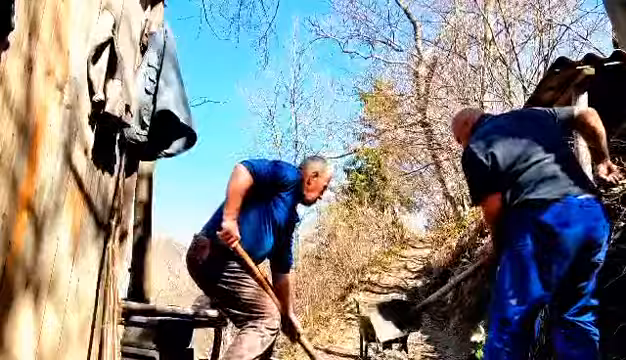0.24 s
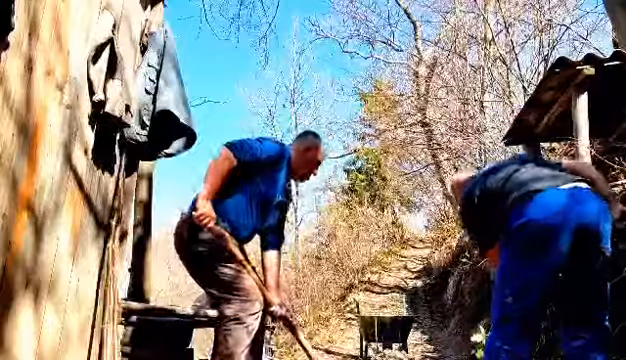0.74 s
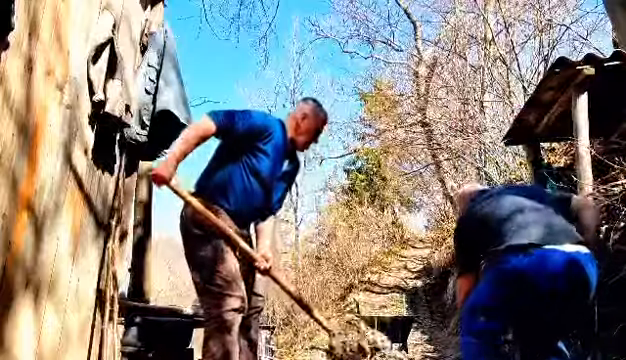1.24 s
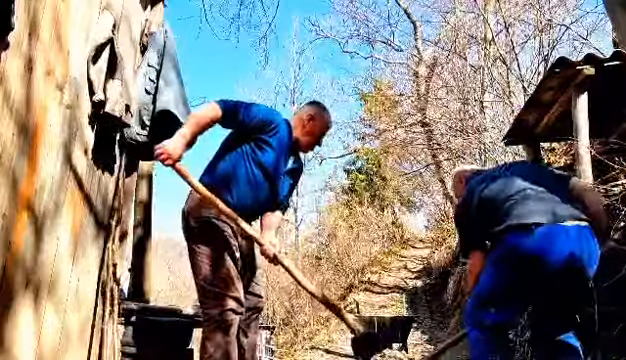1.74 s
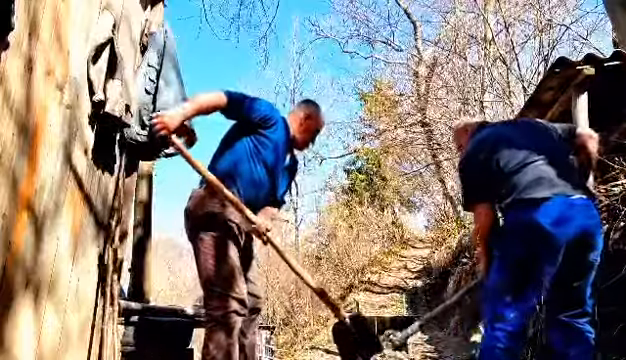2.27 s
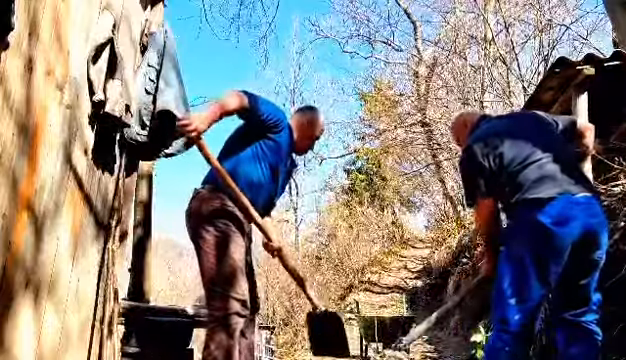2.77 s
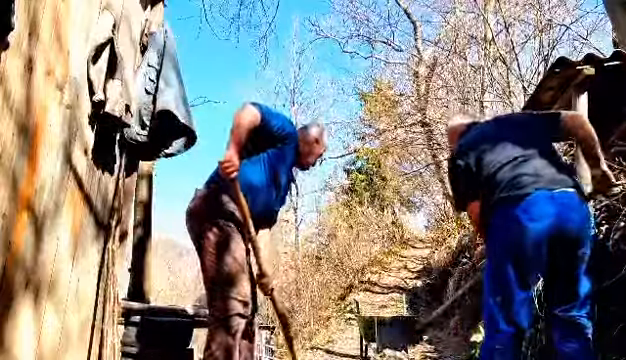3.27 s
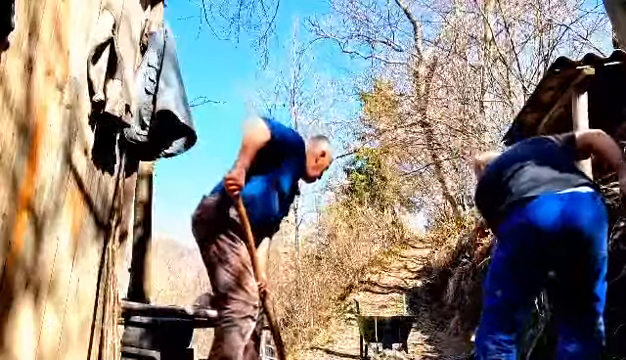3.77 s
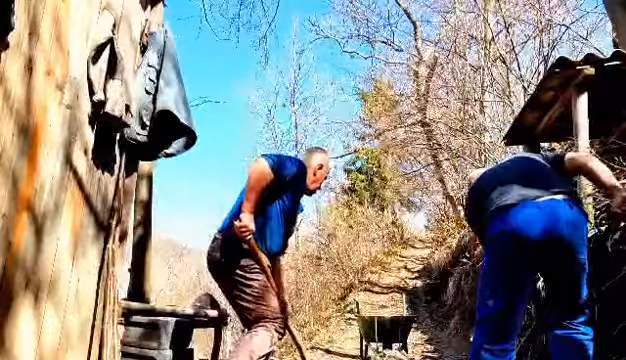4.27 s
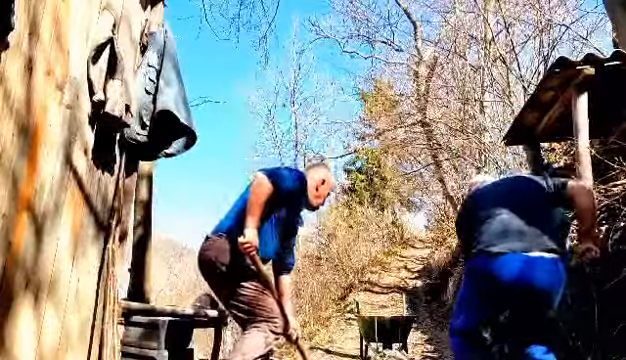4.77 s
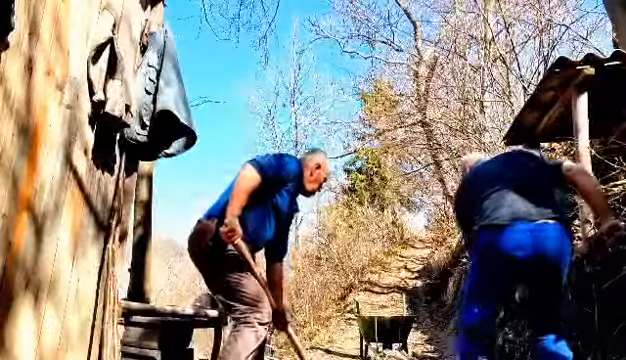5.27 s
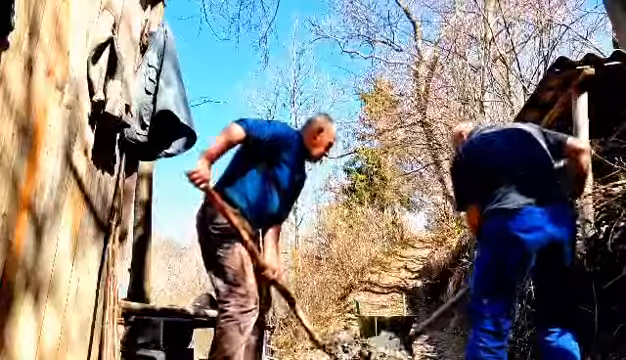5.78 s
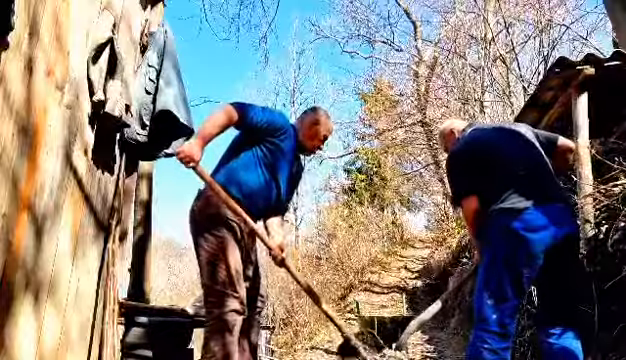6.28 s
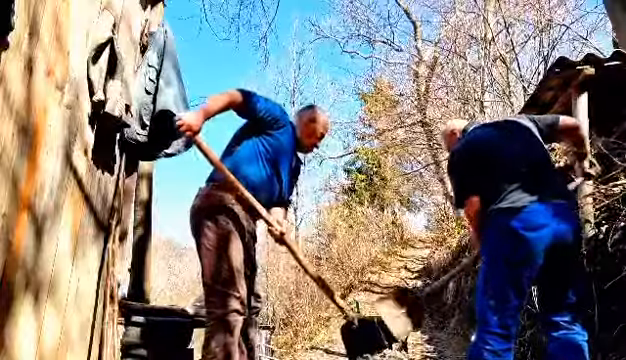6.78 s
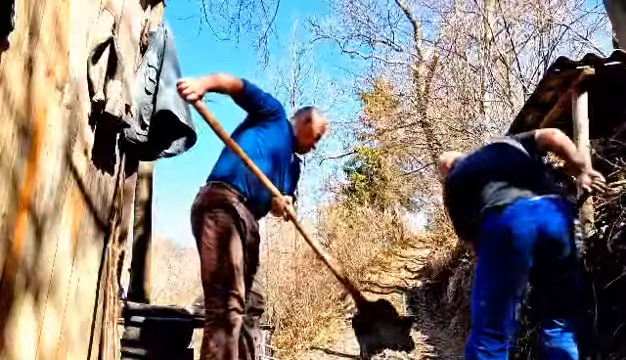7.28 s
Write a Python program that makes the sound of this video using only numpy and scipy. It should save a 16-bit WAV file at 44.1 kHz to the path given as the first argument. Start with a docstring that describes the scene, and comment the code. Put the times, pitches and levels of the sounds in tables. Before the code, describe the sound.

Close outdoor stereo pickup of two men turning wet concrete with steel shovels beside a wall. Dull, gritty pushes into the heap come first, then bright, hissing metallic scrapes with a sharp ringing knock. After a short lull the blade crunches into the heap again, fades, and more rasps and knocks follow. Pebbles tick and lumps thud over faint low air rumble, with slight dull echoes.

```python
"""Two men turn wet concrete with steel shovels on hard ground beside a wall; open air rumbles faintly throughout.
0-1.4 s: a blade pushed into the heap grinds dully, as crushed grains drive damped plate modes. 1.5-3 s: a bare
blade rasps brightly, as grains excite ringing steel; its edge knocks on the ground. 3-5.8 s: the heap grinds again
under a shifting note, with jams, then faintly. 5.9-7.3 s: bare rasps and knocks return; a last push is faint.
Lumps thud, pebbles tick and trapped stones crack in between, as short noise bursts; a few dull echoes follow."""
import sys
import numpy as np
from scipy import signal
from scipy.fft import rfft, irfft
from scipy.io import wavfile

SR = 44100
rng = np.random.default_rng(int(sys.argv[2]) if len(sys.argv) > 2 else 0)


def output_pcm(signal):
    """Save a mono or channel-first signal as 16-bit PCM at the path in sys.argv[1].

    Samples are clipped to [-1, 1] before scaling.
    """
    pcm = np.clip(np.atleast_2d(signal).T, -1, 1) * 32767
    wavfile.write(sys.argv[1], SR, np.round(pcm).astype(np.int16))


N = 332073
TIME = np.arange(N) / SR
HZ = np.maximum(np.fft.rfftfreq(8192, 1 / SR), 1)


def from_db(db):
    """Decibels to gain."""
    return 10 ** (np.asarray(db) / 20)


def rms_one(x):
    """Scale to unit power; of a mid-side pair, the mid sets the scale."""
    return x / np.sqrt(np.mean(np.atleast_2d(x)[0] ** 2) + 1e-20)


def colour(points):
    """Gain over HZ, interpolated in dB over log frequency."""
    hz, db = np.transpose(points)
    return from_db(np.interp(np.log(HZ), np.log(hz), db))


def resonances(modes, order=1):
    """Gain of damped resonances, summed in power; a higher order has steeper skirts."""
    power = 0
    for hz, width_hz, db in modes:
        detuning = (HZ ** 2 - hz ** 2) / (HZ * width_hz)
        power = power + from_db(db) ** 2 / (1 + detuning ** 2 / order) ** order
    return np.sqrt(power)


def through(x, gain):
    """Causal minimum-phase filter with the given gain, by folding the cepstrum."""
    cepstrum = irfft(np.log(gain + 1e-6))
    cepstrum[1:len(HZ) - 1] *= 2
    cepstrum[len(HZ):] = 0
    impulse = irfft(np.exp(rfft(cepstrum)))[:len(HZ)]
    return signal.oaconvolve(x, impulse)[:len(x)]


# stereo image: (frequency [Hz], side re mid [dB])
SIDE_WIDTH = [(100, -14), (350, -12.5), (620, -1.5), (950, -11.5), (1350, -7), (1800, -0.5), (2300, -0.5),
              (3000, -5.5), (4300, -0.5), (5300, 1.5), (6400, -2.5), (7700, 1), (12000, 1.5)]


def radiate(pair, gain):
    """Colour a mid-side pair; the image generally widens toward the treble."""
    return np.array([through(pair[0], gain), through(pair[1], gain * colour(SIDE_WIDTH))])


def drift(rate_hz):
    """Smooth random walk about zero with RMS 1: twice low-passed noise, drawn every 20th sample."""
    pole = np.exp(-40 * np.pi * rate_hz / SR)
    noise = rng.standard_normal(N // 20 + 2002)
    slow = signal.lfilter([1], [1, -2 * pole, pole * pole], noise)[2000:]  # drop the run-in
    return np.interp(np.arange(N) / 20, np.arange(len(slow)), rms_one(slow))


def add(out, start_s, sound):
    """Mix a sound in at a time."""
    at = int(start_s * SR)
    out[:, at:at + sound.shape[1]] += sound[:, :N - at]


def grains(per_s, spread_db, judder_db, judder_hz):
    """Mid-side clicks of crushed grains, uneven in size; stick and slip sways their level."""
    born = rng.random(N) < per_s / SR
    size_db = spread_db * np.minimum(rng.exponential(1, N), 4) + judder_db * drift(judder_hz)
    return born * from_db(size_db) * rng.choice([-1, 1], (2, N))


def stone_ticks(per_s, spread_db, cycles_to_60db, low_hz, high_hz):
    """Coarse gravel: separate stones click on the steel, each at its own pitch; unit power."""
    out, t = np.zeros((2, N)), TIME[:SR // 50]
    for when, where, size, sign, side in rng.random((int(per_s * N / SR), 5)):
        hz = low_hz * (high_hz / low_hz) ** where
        level_db = -spread_db * np.log(max(size, .05))
        tick = np.sin(2 * np.pi * hz * t) * from_db(level_db - 60 * t * hz / cycles_to_60db)
        add(out, when * TIME[-1], np.outer([np.sign(sign - .5), 3 * (side - .5)], tick))
    return rms_one(out)


def sheet(pair, t60_s, ring_db):
    """Each spot on the steel answers with its own crack and ring; contact moves on every 60 ms."""
    out, t = np.zeros((2, N)), TIME[:SR // 8]
    crack_t60_s, stay = .003, int(.06 * SR)
    crack = from_db(-60 * t / crack_t60_s)
    ring = from_db(ring_db) * np.sqrt(crack_t60_s / t60_s) * from_db(-60 * t / t60_s)
    for at in range(0, N, stay):
        answer = rng.standard_normal((2, len(t))) * (crack + ring)
        answer /= np.linalg.norm(answer, axis=1, keepdims=True)
        add(out, at / SR, signal.fftconvolve(pair[:, at:at + stay], answer, axes=1))
    return out


SWELL_DB = 17  # nominal swell over the rise time, scaled by steepness
EDGE_CURVE = 1.146  # above 1, level falls ever faster away from full force
# fall away from full force, the hiss needing force while the mix keeps sliding: [grit, sand, plate, wet mix]
STEEPNESS = [1.015, 1.18, 0.92, 0.91]


def stroke_gains(strokes, release_db_per_s, loading_db):
    """Gains of grit, sand, plate, wet mix: a stroke swells, holds while the blade fills, dies away."""
    loudest_db = np.full((4, N), -120.0)
    for start, end, rise, change_db, *levels_db in strokes:
        near = slice(max(int((start - .4) * SR), 0), int((end + .4) * SR))
        t = TIME[near]
        progress = np.clip((t - start) / max(end - start, .005), 0, 1) - .5
        slack = np.maximum(start - t, 0) / rise + np.maximum(t - end, 0) * release_db_per_s / SWELL_DB
        held_db = np.c_[levels_db] + np.outer(change_db + np.array(loading_db), progress)
        stroke_db = held_db - SWELL_DB * np.outer(STEEPNESS, slack ** EDGE_CURVE)
        loudest_db[:, near] = np.maximum(loudest_db[:, near], stroke_db)
    return from_db(loudest_db)


def burst(fall_s, gain):
    """Rattle of contacts dying by 1/e in fall_s, in the given colour; about 1 high at its start."""
    t = TIME[:SR // 2]
    contacts = rng.choice([-1, 1], (2, len(t))) * np.exp(-t / fall_s)
    return radiate(contacts, rms_one(gain))


def ringing(modes, t):
    """Mid-side sum of dying modes, each at a random phase."""
    out = np.zeros((2, len(t)))
    for hz, db, t60_s in modes:
        phase = rng.uniform(0, 2 * np.pi, (2, 1))
        out += from_db(db - 60 * t / t60_s) * np.sin(2 * np.pi * hz * t + phase)
    return out


def wander(pair, speed):
    """Shift all resonances together by a slowly changing ratio, by variable-speed reading."""
    clock = np.cumsum(speed) % N
    return np.array([np.interp(clock, np.arange(N), part) for part in pair])


# rumble and hiss spectrum: (frequency [Hz], relative level [dB])
AIR_COLOUR = [(20, -14), (40, -11), (80, -2.5), (130, -11.5), (200, -13), (300, -23.5), (500, -28.5),
              (1000, -28), (1800, -39.5), (3000, -32), (7000, -45.5), (8300, -47.5), (13000, -54)]
# rumble level before drift: (time [s], level [dB])
AIR_LEVEL = [(0, -62.5), (2.9, -62.5), (3.4, -65.5), (4.6, -61), (5.1, -65), (7.4, -63.5)]


def air():
    """Low outdoor rumble that swells a little, under a faint hiss: coloured noise."""
    noise = rms_one(radiate(rng.standard_normal((2, N)), colour(AIR_COLOUR)))
    level_db = np.interp(TIME, *np.transpose(AIR_LEVEL)) + 1.4 * drift(8.2)
    return from_db(level_db) * noise


# echoes from wall and shed: (delay [s], level before trim [dB])
WALL_ECHOES = [(.0113, -17.5), (.0187, -17), (.031, -23.5), (.047, -28)]


def yard(pair):
    """A few delayed, low-passed copies of the mid, from left and right in turn."""
    out, dull = np.zeros((2, N)), through(pair[0], 1 / np.hypot(1, HZ / 5000))
    for k, (delay_s, db) in enumerate(WALL_ECHOES):
        add(out, delay_s, from_db(db - 2.5) * np.array([dull, 1.1 * (-1) ** k * dull]))
    return out


# heavy lumps land: (time [s], level [dB], 1/e fall time [s])
LUMP_FALLS = [(0.049, -73, 0.058), (0.68, -54, 0.072), (1.19, -53.5, 0.062), (1.388, -48.5, 0.025),
              (2.504, -42.5, 0.011), (3.792, -57, 0.011), (3.905, -45, 0.013), (4.716, -57, 0.065),
              (6.367, -42, 0.0062)]
# thud spectrum: (frequency [Hz], relative level [dB])
THUD_COLOUR = [(40, -3.5), (80, -6.5), (130, 12.5), (200, -7), (340, -3.5), (700, -33.5), (1500, -58)]


def lumps():
    """Shovelfuls land with a soft thud: low-coloured noise bursts."""
    out = np.zeros((2, N))
    for s, db, fall_s in LUMP_FALLS:
        add(out, s, from_db(db) * burst(fall_s, colour(THUD_COLOUR)))
    return out


# pebbles flick against the blade: (time [s], level [dB], pitch [Hz])
PEBBLE_HITS = [(0.708, -57, 4030), (1.394, -55, 3970), (1.6435, -44, 2780), (1.654, -39, 2530),
               (1.902, -45, 3900), (0.239, -72, 5540), (3.514, -65.5, 2660), (3.5534, -52.5, 2127),
               (3.579, -50, 1670), (3.601, -56, 2300), (3.7258, -50, 2330), (3.8743, -48, 2300),
               (3.919, -44.5, 5200), (4.0206, -44, 1900), (4.134, -47, 2000), (4.427, -42, 5950),
               (4.5553, -52, 3740), (4.574, -47, 5370), (4.686, -43, 2380), (4.7231, -50, 2900),
               (5.746, -51.5, 5400), (6.668, -40.5, 2540)]


def pebbles():
    """Small stones tick in a broad resonance: short noise bursts."""
    out = np.zeros((2, N))
    for s, db, hz in PEBBLE_HITS:
        tick = resonances([(hz, 0.59 * hz, 0)], order=2) * colour([(7500, 8.0), (8300, 1.0)])
        add(out, s, from_db(db) * burst(0.0097, tick))
    return out


# steel strikes ground: (time [s], chatter level [dB], dull above [Hz], chatter 1/e time [s],
#  ring re chatter before trim [dB], clunk re chatter [dB])
GROUND_KNOCKS = [ (1.398, -41.5, 5030, 0.008, -17, 4), (2.081, -36, 7000, 0.009, -4, -27),
                 (2.2389, -32, 13300, 0.0085, -8, -34), (2.5033, -22, 10830, 0.0017, -12.5, -20),
                 (2.5064, -19.5, 11000, 0.0028, -4, -17), (2.5100, -28, 3000, 0.0024, -16, -18),
                 (2.523, -31.5, 9000, 0.006, -3.5, -20), (3.7907, -37, 3120, 0.01, -23, -9),
                 (6.092, -43, 12000, 0.0076, -6, -17), (6.3688, -29, 995, 0.0046, -8, 2),
                 (6.394, -35, 3000, 0.0029, -11, -5), ]
# chatter spectrum: (frequency [Hz], relative level [dB])
KNOCK_COLOUR = [(100, -27), (280, -15.5), (430, -2.5), (570, -11.5), (800, -5), (980, 4), (1230, -5.5),
                (1450, -6.5), (1850, -11), (2400, -0.5), (2850, 0.5), (3400, -2), (4000, -5.5), (4950, -13),
                (5500, -8), (7050, -2.5), (7900, -23), (9500, -14), (11300, -23), (12500, -17),
                (13200, -27)]
# free ringing of a struck blade: (frequency [Hz], level [dB], t60 [s])
RING_MODES = [(300, -9, 0.11), (977, -5.5, 0.027), (1268, -4, 0.14), (1564, -7.5, 0.12), (2100, -16.5, .11),
              (2440, -13, 0.17), (2814, 0, 0.099), (2870, -4.5, 0.12), (3460, -6, 0.093),
              (3700, -14.5, 0.13), (4027, -8.5, .09), (4680, -22, 0.066), (5460, -18, 0.057),
              (6212, -14, 0.088), (7330, -14, 0.046), (9600, -13, 0.062)]
# flexing of a flat-landing blade, soon damped by the ground: (frequency [Hz], level [dB], t60 [s])
FLEX_MODES = [(309, -8.5, 0.05), (401, -6.5, .055), (730, -1.5, 0.053), (1100, -1, .03), (1326, -2, 0.039)]


def knocks():
    """The edge chatters on hard ground and the steel rings on; a flat landing also flexes with a low clunk."""
    out, t = np.zeros((2, N)), TIME[:SR // 2]
    for s, db, dull_hz, chatter_s, ring_db, clunk_db in GROUND_KNOCKS:
        soft = 1 / np.hypot(1, HZ / dull_hz)
        chatter = burst(chatter_s, colour(KNOCK_COLOUR) * soft)
        ring = radiate(ringing(RING_MODES, t) * (1 - np.exp(-t / 0.0012)), soft)
        clunk = ringing(FLEX_MODES, t) * (1 - np.exp(-t / 0.0021))
        clunk *= [[1], [from_db(-7.5)]]  # narrow image
        knock = chatter + from_db(ring_db - 5.0) * ring + from_db(clunk_db) * clunk
        add(out, s, from_db(db) * knock)
    return out


# a stone catches under the edge and jolts the plate: (time [s], peak [dB], plate note [Hz], crack [dB])
STONE_CATCHES = [(0.892, -37, 870, -23), (1.215, -36, 1040, -30), (1.658, -39, 1310, -21),
                 (1.779, -36.5, 1020, -18), (1.985, -32, 1340, -6), (2.71, -35, 1090, -21),
                 (3.827, -40, 1220, -20), (3.849, -37, 1220, -18), (3.924, -36.5, 525, -15),
                 (4.122, -36, 1120, -32), (4.227, -35, 1090, -21), (4.31, -37, 525, -24),
                 (4.507, -39, 940, -16), (4.689, -44, 1200, -23), (6.295, -41, 1130, -22),
                 (6.306, -34, 775, -23), (6.499, -35.5, 1150, -17), (6.533, -35.5, 1160, -25),
                 (6.582, -31.5, 1120, -10.5), (6.67, -40, 1150, -26), (6.701, -36, 1330, -11),
                 (6.881, -34.5, 1130, -17), (6.9, -33, 1310, -12), (7.013, -37, 1150, -4)]


def catches():
    """A trapped stone lets go with a crack and a short note of the plate: a resonant burst."""
    out = np.zeros((2, N))
    for s, db, hz, crack_db in STONE_CATCHES:
        modes = [(hz, 0.19 * hz, 0), (2900, 1900, crack_db), (6400, 1500, crack_db - 21)]
        jolt = burst(0.0027, resonances(modes, order=2))
        add(out, s, from_db(db) * jolt / np.abs(jolt).max())
    return out


# blade pushed through the heap, one row a push; levels before the layer trims:
# (full force from [s], until [s], rise [s], change of force [dB],
#  grit [dB], sand hiss [dB], plate [dB], wet mix [dB])
HEAP_PUSHES = [ (0.1, 0.3, .1, -3, -77, -82.5, -71, -75.5), (0.39, 0.70, 0.14, -1.5, -68, -81, -61, -63.5),
               (0.815, 0.915, 0.11, 1.5, -49, -54.5, -52.5, -54.5),
               (0.95, 1.08, 0.06, -5, -57.5, -66.5, -56.5, -70),
               (1.16, 1.26, 0.15, 0, -51.5, -59, -49, -46), (1.28, 1.37, .05, -8, -58.5, -64.5, -54, -52),
               (1.402, 1.428, 0.038, -3.5, -47.5, -52, -49.5, -50.5),
               (3.03, 3.28, 0.081, -0.5, -77, -78.5, -81.5, -93),
               (3.585, 3.77, 0.048, 9.5, -58.5, -70, -56.5, -65.5),
               (3.80, 4.06, 0.043, -0.5, -51.5, -61, -47.5, -62),
               (4.09, 4.42, 0.092, 0.5, -51, -60, -45.5, -52.5),
               (4.46, 4.64, 0.044, 5, -54.5, -61, -50, -54.5),
               (4.675, 4.76, 0.11, -2, -49.5, -61.5, -46, -46.5),
               (4.80, 4.825, 0.047, -11, -61, -69, -59, -57), (4.94, 5.33, 0.2, 3, -72, -80, -66, -66),
               (5.40, 5.56, 0.22, -0.5, -71, -74.5, -65.5, -71),
               (5.66, 5.84, 0.35, 4.5, -72, -72, -78, -78), (7.39, 7.52, 0.49, 5, -73, -73.5, -77, -73), ]
# buried plate's note, lowered by its load; 1010 Hz leaves the modes unshifted: (time [s], note [Hz])
LOADED_NOTE = [(.4, 993), (.9, 936), (1.25, 1003), (3.58, 1236), (3.85, 1086), (4.1, 1039), (4.4, 1001),
               (4.7, 1042)]
# gravel jams and the blade grinds harder: (time [s], 1/e half-length [s], level before trim [dB], note [Hz])
GRAVEL_JAMS = [(0.408, 0.087, 12, 979.6), (3.852, 0.02, 4, 1229), (4.099, 0.036, 12.5, 954.5),
               (4.256, 0.033, 8.5, 1032), (4.388, 0.02, 10, 924), (5.06, 0.015, 17.5, 1064),
               (5.222, 0.012, 10, 1051)]
# buried plate, its low bending under wet mix, its rasp: (frequency [Hz], width [Hz], level [dB])
BURIED_PLATE_MODES = [(892, 85, 4.5), (1063, 81, 3.5), (1195, 380, 0), (1466, 61, -4.5)]
BURIED_BODY_MODES = [(295, 107, -1), (409, 64, -1.5), (517, 89, 1.5), (685, 80, -1), (803, 45, 0.5)]
BURIED_RASP_MODES = [(1810, 160, -9), (2280, 370, -11), (2930, 67, 2.5), (3970, 240, -12), (7300, 81, 2.5)]
# grit and sand spectra, shared with the scrapes: (frequency [Hz], relative level [dB])
GRIT_COLOUR = [(1300, -26), (1850, -7), (2050, -5.5), (2400, -2), (2950, -2), (3150, -2.5), (4000, -4),
               (4600, -11), (6000, -44)]
SAND_COLOUR = [(3400, -33.5), (4600, -4), (5400, 3), (6700, 2), (7700, -2.5), (8200, -10), (10300, -10),
               (11400, -19), (12500, -5.5), (13300, -35)]


def digs():
    """Gravel crunches against a buried, damped blade whose note follows its load."""
    grit_gain, sand_gain, plate_gain, mix_gain = stroke_gains(
        HEAP_PUSHES, release_db_per_s=178.5, loading_db=[-0.41, -0.69, -0.49, 0.17])
    steel = np.hypot(1, resonances(BURIED_RASP_MODES))

    crushed = grains(per_s=4000, spread_db=0.5, judder_db=1.34, judder_hz=11)
    gravel = from_db(5.5) * grains(per_s=62, spread_db=1.5, judder_db=0.5, judder_hz=130)
    fine = sheet(crushed + gravel, t60_s=0.064, ring_db=5.0)
    grit_tilt = colour([(1700, 3.5), (2700, -2.5), (4000, -3.5)])
    crunch = rms_one(radiate(fine, colour(GRIT_COLOUR) * steel * grit_tilt))
    ticks = stone_ticks(per_s=160, spread_db=2.0, cycles_to_60db=26, low_hz=1256, high_hz=4160)
    grit = grit_gain * (crunch + from_db(-9.0) * ticks)
    sand_tilt = colour([(5000, 2.2), (12000, -3.0)])
    sand = sand_gain * rms_one(radiate(fine, colour(SAND_COLOUR) * steel * sand_tilt))

    stones = grains(per_s=1500, spread_db=0.5, judder_db=0.8, judder_hz=17)
    groan = rms_one(radiate(stones, resonances(BURIED_PLATE_MODES, order=2)))
    groan = wander(groan, np.interp(TIME, *np.transpose(LOADED_NOTE)) / 1010)

    # in a jam the edge sticks and slips, driving one narrow note between the plate's lowest modes
    slips = grains(per_s=1400, spread_db=0.0, judder_db=0.9, judder_hz=46)
    jam_gain = sum(from_db(db) * np.exp(-((TIME - s) / length_s) ** 2) for s, length_s, db, _ in GRAVEL_JAMS)
    jam_s, _, _, jam_hz = np.transpose(GRAVEL_JAMS)
    squeal = rms_one(radiate(slips, resonances([(jam_hz.mean(), 85, 0)], order=2)))
    squeal = wander(squeal, np.interp(TIME, jam_s, jam_hz) / jam_hz.mean())
    plate = plate_gain * (groan + from_db(-5.5) * jam_gain * squeal)

    clods = grains(per_s=800, spread_db=2.0, judder_db=2.5, judder_hz=21)
    mix = mix_gain * rms_one(radiate(clods, resonances(BURIED_BODY_MODES, order=2)))
    return from_db(-1.22) * grit + from_db(0.9) * sand + from_db(-1.0) * plate + from_db(-4.5) * mix


# bare plate, and low bending of bare blade and shaft:
# (frequency [Hz], width [Hz], level in first bout [dB], level in second bout [dB])
BARE_PLATE_MODES = [(943, 129, 2.5, 0), (1130, 155, 0, 1.5), (1335, 138, 4, 2), (1552, 110, -0.5, -1),
                    (1730, 200, -22, -12.5)]
BARE_BODY_MODES = [(308, 73, -4, -2.5), (401, 72, 1.5, 5), (501, 66, 1, 1), (703, 98, 2.5, 5),
                   (795, 64, -16, 0.5)]


def bare_modes(modes, start_s):
    """The blade is held at another angle in each bout, which weights its modes differently."""
    in_bout = [(hz, width, first if start_s < 4 else second) for hz, width, first, second in modes]
    return resonances(in_bout, order=3)


# upper resonances that stand out of the rasp: (frequency [Hz], width [Hz], level [dB])
BARE_RASP_MODES = [(2175, 76, 0), (2300, 55, -7), (2560, 220, -5), (2860, 110, 3.5), (3410, 110, -1),
                   (4950, 110, -1), (5800, 60, 7.5), (6590, 200, 5.5), (7140, 170, 6)]


def stroke_colours(start_s, plate_hz, edge_hz, whistle_hz, tilt_db_per_octave):
    """Colours of grit, sand, plate, wet mix for one scrape, with the notes its contact point favours."""
    favoured = [(edge_hz, 76, 6.5), (whistle_hz, 75, 5.8)]
    steel = np.hypot(1, resonances(BARE_RASP_MODES + favoured))
    note = np.hypot(1, resonances([(plate_hz, 60, 1.2)]))
    octaves = np.log2(np.maximum(HZ / edge_hz, .5))
    grit = colour(GRIT_COLOUR) * steel * from_db(tilt_db_per_octave * octaves)
    sand = colour(SAND_COLOUR) * steel
    plate = bare_modes(BARE_PLATE_MODES, start_s) * note
    mix = bare_modes(BARE_BODY_MODES, start_s) * note
    return grit, sand, plate, mix


# bare blade dragged over the ground, one row a stroke; levels before the layer trims:
# (full force from [s], until [s], rise [s], change of force [dB],
#  grit [dB], sand hiss [dB], plate [dB], wet mix [dB],
#  plate note [Hz], edge note [Hz], whistle [Hz], grit tilt [dB per octave])
BARE_STROKES = [ (1.57, 1.662, .07, 1.5, -42.5, -42, -44, -50.5, 1031, 2260, 6620, 4),
                (1.72, 1.845, 0.055, -3, -46.5, -47, -49.5, -50.5, 1030, 2840, 6560, 0),
                (1.919, 1.992, 0.032, 4, -43.5, -42.5, -46.5, -55.5, 936, 2950, 5730, -0.5),
                (2.077, 2.149, 0.03, -7, -43, -44.5, -46.5, -46.5, 1350, 2640, 4791, 1.5),
                (2.238, 2.381, 0.018, -8, -46.5, -47.5, -47.5, -56, 1310, 2640, 6750, -1),
                (2.482, 2.524, 0.11, 6.5, -51.5, -54.5, -51, -55, 1280, 2940, 6160, 2.5),
                (2.637, 2.727, 0.068, 1.5, -48.5, -50.5, -49, -54, 1020, 2210, 6040, -1),
                (2.853, 2.918, 0.042, -6.5, -53.5, -58.5, -55, -64, 1248, 2180, 5270, 4.5),
                (5.908, 6.103, 0.06, -1.5, -56, -61, -54.5, -62, 1000, 2740, 5640, -4),
                (6.097, 6.131, 0.014, 2, -43.5, -45, -47, -50.5, 1390, 2900, 6160, 2.5),
                (6.143, 6.235, .05, 1, -57, -62, -56.5, -54.5, 1120, 2900, 6400, -1),
                (6.292, 6.406, 0.071, 0, -45.5, -48.5, -44, -50, 730, 2320, 6150, -3.5),
                (6.504, 6.582, 0.08, 4.5, -47.5, -53, -50, -51, 1090, 2820, 7400, -6.5),
                (6.662, 6.745, 0.018, 0.5, -49, -51, -50.5, -59, 1300, 2240, 6600, 0.5),
                (6.896, 6.999, 0.15, -0.5, -48.5, -50, -49, -52, 1150, 2860, 6200, 0.5),
                (6.995, 7.3, 0.084, -3, -53.5, -54, -50, -57.5, 1100, 2720, 6500, 0.5), ]


def stroke_by_stroke(pair, colours):
    """Give each scrape its own colour, changing over midway between strokes; unit power."""
    starts, ends = np.transpose(BARE_STROKES)[:2]
    lulls = np.r_[0, (ends[:-1] + starts[1:]) / 2 * SR, N].astype(int)
    out = np.zeros((2, N))
    for gain, first, last in zip(colours, lulls, lulls[1:]):
        with_tail = np.hstack([pair[:, first:last], np.zeros((2, len(HZ)))])
        add(out, first / SR, radiate(with_tail, rms_one(gain)))
    return rms_one(out)


def scrapes():
    """Grit and sand crushed under bare steel; stones shake the plate, wet mix drags on the whole blade."""
    forces = [row[:8] for row in BARE_STROKES]
    grit_gain, sand_gain, plate_gain, mix_gain = stroke_gains(
        forces, release_db_per_s=322.5, loading_db=[0, -3, -1.4, 2.5])
    colours = [stroke_colours(row[0], *row[8:]) for row in BARE_STROKES]
    grit_colours, sand_colours, plate_colours, mix_colours = zip(*colours)

    crushed = grains(per_s=5000, spread_db=2.0, judder_db=0.03, judder_hz=71)
    gravel = from_db(4.0) * grains(per_s=100, spread_db=1.3, judder_db=1.5, judder_hz=17)
    fine = sheet(crushed + gravel, t60_s=0.08, ring_db=3.5)
    ticks = stone_ticks(per_s=130, spread_db=3.0, cycles_to_60db=18, low_hz=1900, high_hz=6000)
    grit = grit_gain * (stroke_by_stroke(fine, grit_colours) + from_db(-11.5) * ticks)
    sand = sand_gain * stroke_by_stroke(fine, sand_colours)

    stones = grains(per_s=2200, spread_db=1.0, judder_db=1.4, judder_hz=33)
    plate = plate_gain * stroke_by_stroke(stones, plate_colours)
    mix = mix_gain * stroke_by_stroke(stones, mix_colours)
    return from_db(1.0) * grit + from_db(0.53) * sand + plate + from_db(-3.3) * mix


# stereo balance: (frequency [Hz], left re right [dB])
LEFT_LEAN = [(100, -1.3), (300, -1.7), (520, -2), (950, -0.38), (2000, 0.78), (3200, -1), (4500, -1.5),
             (5500, 0.6), (9000, 1), (12500, -0.7)]


def scene():
    """Air, echoes and shovels, turned from mid and side into left and right."""
    work = lumps() + pebbles() + knocks() + catches() + digs() + scrapes()
    mid, side = air() + yard(work) + work
    lean = np.sqrt(colour(LEFT_LEAN))
    return np.array([through(mid + side, lean), through(mid - side, 1 / lean)])


def record(dry):
    """Cut the top steeply above 13.2 kHz with an elliptic low-pass."""
    low_pass = signal.ellip(12, .1, 70, 13200, fs=SR, output="sos")
    return signal.sosfilt(low_pass, dry)


dry = scene()
out = record(dry)
output_pcm(out)
```